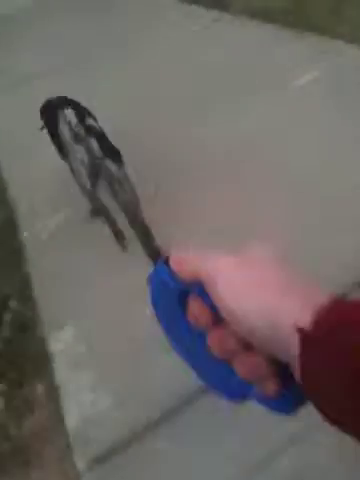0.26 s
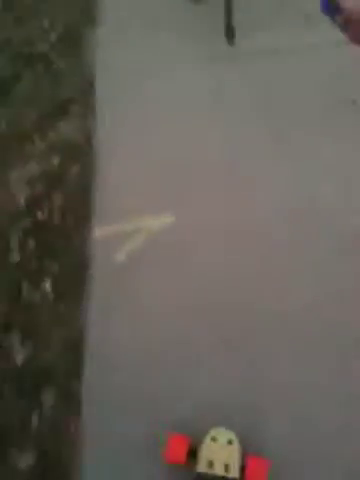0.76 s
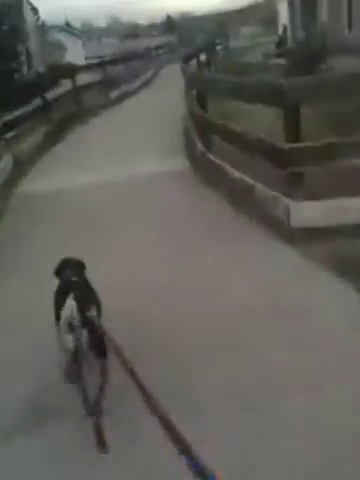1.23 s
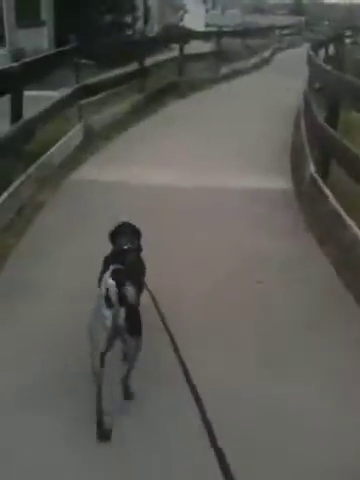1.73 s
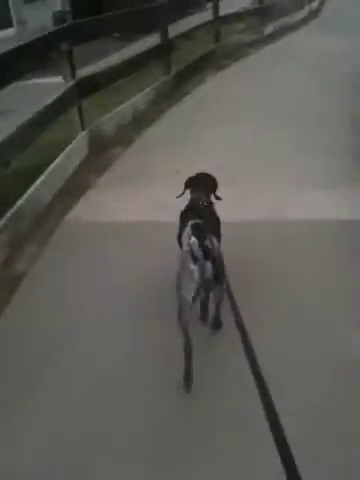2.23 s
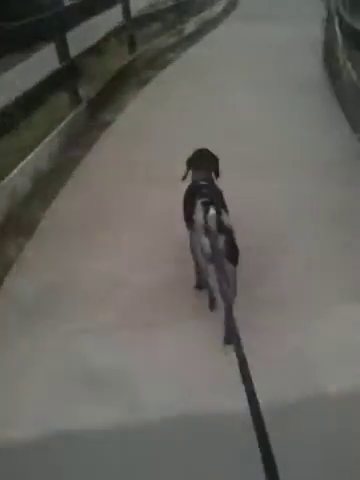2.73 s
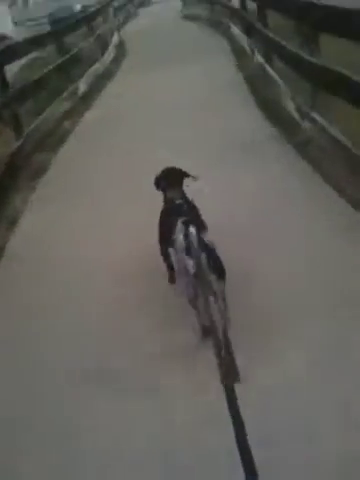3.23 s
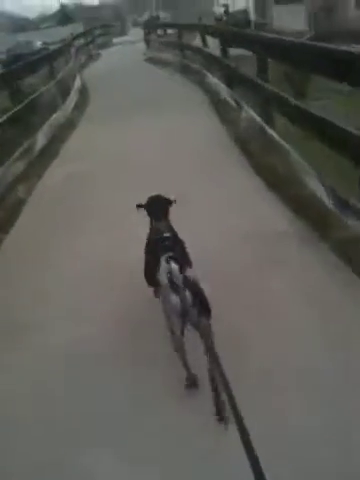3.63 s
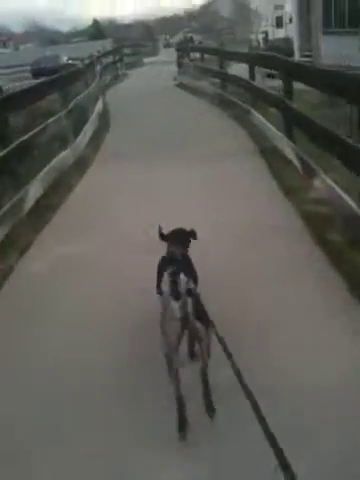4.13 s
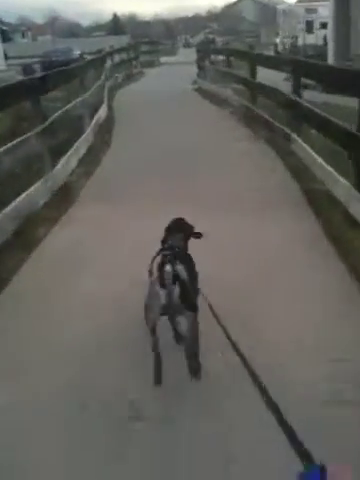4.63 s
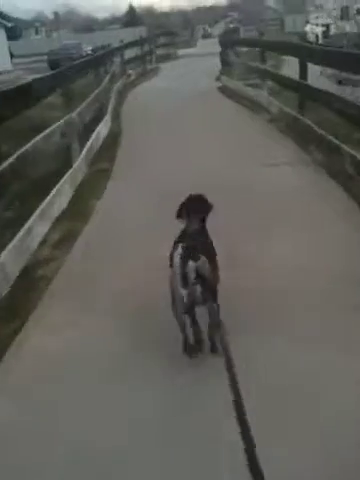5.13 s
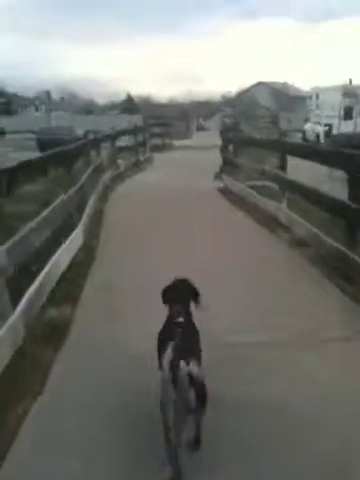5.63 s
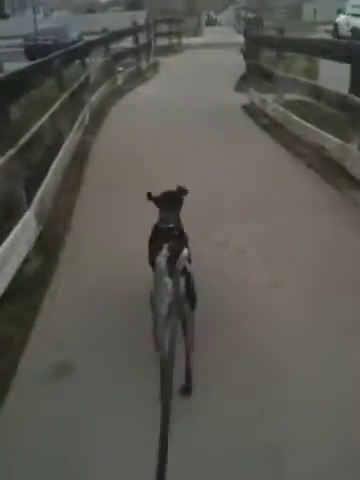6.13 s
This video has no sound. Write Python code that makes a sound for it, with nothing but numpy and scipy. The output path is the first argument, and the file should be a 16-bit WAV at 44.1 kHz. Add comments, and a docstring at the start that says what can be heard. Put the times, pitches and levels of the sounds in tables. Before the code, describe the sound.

Close, mono outdoor sound of a longboard rolling on concrete. The first second is a crowded clatter of hollow deck thumps, truck rattle and bright plastic clicks from a leash handle. Then the roll smooths into a low rumble with soft hiss, broken by double knocks as front and rear axles cross slab joints, growing stronger and closer together. A light sleeve swish comes now and then, and one crisp handle click near the end.

```python
"""A longboard rolls along a fenced concrete path: noise filtered by deck, trucks and treads, with faint bearings.
Wheels knock over cracks, gaps and slab joints, front axle then rear: chattering noise bursts and ringing deck modes.
The rails scatter a faint answer. The plastic handle of a leash clicks as decaying sines and snaps,
a sleeve swishes as swelling noise, and loose grains crack under the treads."""
import sys
import numpy as np
from scipy import signal
from scipy.fft import rfft, irfft, next_fast_len
from scipy.io import wavfile
from scipy.ndimage import map_coordinates

SR = 44100
rng = np.random.default_rng(int(sys.argv[2]) if len(sys.argv) > 2 else 0)


def wav_record(signal):
    """Record a signal, one row per channel, as 16-bit PCM in the file named by sys.argv[1]."""
    frames = np.transpose(np.atleast_2d(signal))
    bounded = np.clip(frames, -1, 1)
    # unit amplitude maps onto the largest positive 16-bit level
    quanta = np.round(bounded * 32767).astype(np.int16)
    wavfile.write(sys.argv[1], SR, quanta)


N = 281358
TIME_S = np.arange(N) / SR
TOP_HZ = 16050  # upper band limit

# How hard the concrete shakes the board. Each row: time in seconds, level in dB.
SHAKING = [(0.0, -39), (0.76, -47.5), (1.1, -49), (1.7, -48.5), (2.06, -43.5), (2.45, -47), (3.4, -45),
           (3.52, -42), (3.66, -47), (4.3, -44), (4.62, -40.5), (5.06, -43.5), (5.58, -39.5), (5.79, -38.5),
           (5.99, -47.5), (6.38, -46)]
# Rolling treble. Each row: time in seconds, level in dB.
TREBLE = [(0.0, -51), (0.53, -48.5), (0.92, -50.5), (1.1, -49), (1.4, -55), (5.06, -52), (5.53, -50.5),
          (6.09, -52), (6.38, -52)]
# Brief swells of the boom. Each row: time of the height in seconds, bell's standard deviation in seconds, level in dB.
BOOM_SWELLS = [(0.05, 0.091, -36), (0.985, 0.026, -38)]
# Slab joints. Each row: time of the front axle in seconds, thud centre in Hz, then for the front axle
# and again for the rear: strength in dB, contact in seconds, brightness in dB, truck ring in Hz.
JOINTS = [(1.375, 333, -37.5, 0.033, 5.2, 2330, -31, 0.032, -0.5, 2820),
          (1.947, 346, -27, 0.013, 1.1, 2750, -27, 0.032, -1, 2480),
          (2.607, 302, -31.5, 0.02, 3.6, 2100, -33, 0.02, 0, 2860),
          (3.786, 380, -28.5, 0.018, 3.9, 2820, -30.5, 0.029, 2, 2670),
          (4.462, 360, -25, 0.014, 7.3, 2930, -25, 0.025, 2.5, 2370),
          (5.111, 403, -25.5, 0.0095, 8.4, 2380, -24.5, 0.011, 3, 2300),
          (5.744, 350, -26.5, 0.013, 7.1, 2310, -25.5, 0.023, 4, 1970)]
# Cracks and rough spots. Each row: time in seconds, strength in dB, thud centre in Hz,
# contact in seconds, brightness in dB, truck ring in Hz.
CRACKS = [(0.023, -38.5, 261, 0.019, 9.5, 1900), (0.042, -31, 455, 0.021, 11.5, 1590),
          (0.083, -33, 436, 0.033, 7, 1660), (0.184, -39.5, 440, 0.0043, 0, 2300),
          (0.258, -32.5, 378, 0.021, 0, 2690), (0.286, -33.5, 477, 0.015, 6, 2780),
          (0.3056, -26.5, 480, 0.03, -0.5, 2780), (0.342, -26.5, 428, 0.029, 0, 2800),
          (0.439, -30.5, 377, 0.018, 6, 2820), (0.523, -23.5, 420, 0.011, 2, 2920),
          (0.593, -24.5, 383, 0.037, 4, 2300), (0.605, -22.5, 394, 0.0066, 2, 1700),
          (0.711, -32, 510, 0.018, 6, 1680), (0.747, -37.5, 450, 0.011, -5, 1660),
          (0.805, -29, 400, 0.017, -1, 1540), (0.895, -24, 434, 0.024, 3, 1490),
          (0.943, -23.5, 368, 0.018, 2.5, 1485), (3.181, -39, 340, 0.032, 1, 2300),
          (3.325, -47.5, 420, 0.0059, 6, 2700), (3.546, -36, 410, 0.0076, -2.5, 2280)]
# A wheel lands squarely on the far edge of a gap. Each row: time in seconds, thump peak in dB, thud centre in Hz,
# t60 of the added damping in seconds, clack relative to the peak in dB, truck ring in Hz.
SLAMS = [(0.0584, -18.5, 420, 0.0087, -33, 1600), (0.0844, -17.5, 443, 0.0069, -29, 1650),
         (0.1036, -19.5, 450, 0.006, -21, 1600), (0.1429, -18.5, 404, 0.011, -31, 2300),
         (0.3046, -17.5, 480, .016, -21.5, 2780), (0.3208, -20.5, 520, 0.0077, -23, 2780),
         (0.3258, -16, 480, 0.0095, -25, 2840), (0.3443, -17, 380, 0.017, -28, 2780),
         (0.437, -16.5, 387, 0.0069, -29, 2780), (0.525, -16.5, 396, 0.02, -21, 2900),
         (0.604, -11, 336, 0.024, -22, 1650), (0.633, -19.5, 450, .016, -22, 2300),
         (0.816, -15.5, 335, 0.015, -32, 1550), (0.898, -23, 458, .016, -22, 1500),
         (0.9434, -12, 280, 0.023, -27, 1500), (0.957, -19, 328, 0.014, -19.5, 1610),
         (1.398, -24.5, 360, 0.0079, -23, 2330), (1.945, -20, 270, 0.04, -22.5, 2780),
         (2.2012, -20.5, 262, .014, -34, 2400), (2.6196, -22.5, 347, 0.008, -23, 2110),
         (2.851, -21.5, 278, 0.024, -35, 2860), (3.7939, -17, 292, 0.016, -35, 2870),
         (4.016, -30, 402, 0.014, -33, 2670), (4.4639, -11, 395, 0.095, -23, 2870),
         (4.6798, -9, 310, 0.02, -28.5, 2430), (4.697, -29, 350, 0.022, -25, 2820),
         (5.1152, -15.5, 390, 0.02, -23, 2380), (5.3129, -18.5, 370, 0.014, -20.5, 2420),
         (5.321, -18.5, 443, 0.007, -21, 2330), (5.7486, -12, 340, 0.032, -26, 2300),
         (5.76, -21, 380, 0.022, -21, 2320), (5.938, -18.5, 328, .016, -22.5, 1970),
         (5.952, -24, 400, 0.013, -15.5, 1560)]
# Loose grains under a tread. Each row: time in seconds, strength in dB, ring in Hz, t60 in seconds.
PEBBLES = [(0.035, -51, 9000, .015), (0.0615, -40, 7100, .012), (0.185, -47, 6000, .008),
           (0.3072, -42, 4250, 0.014), (0.324, -42, 3770, .018), (0.606, -45, 5250, .02),
           (0.828, -53, 3500, .012), (1.4995, -62, 6500, 0.014), (2.357, -56.5, 4110, .05),
           (3.566, -58, 4400, .012), (3.7922, -45, 6430, .012), (4.019, -46, 6900, 0.018),
           (5.1132, -35.5, 5460, .025)]
# Leash handle. Each row: time in seconds, main ring level in dB, shell and snap relative to it in dB, main ring in Hz,
# main ring length as a factor, upper ring in Hz, upper ring in dB before a 2 dB cut, second tap relative in dB.
CLICKS = [(0.0228, -35, 4.5, 1900, 0.58, 3360, 8, -18), (0.0437, -30, -3, 1630, 1.2, 5080, -7, -8),
          (0.0476, -18.5, -8, 1560, 0.9, 5040, -4.5, -17), (0.0686, -32.5, 4.5, 1570, 0.91, 8540, 6, -17),
          (0.1026, -32.5, -2, 1600, 0.96, 2900, -5, -16), (0.1627, -31, -11, 1560, 1, 2300, -14, -19),
          (0.1727, -30.5, 1, 1550, 0.9, 2300, 5, -20), (0.2279, -14.5, -2, 1560, 0.98, 2330, -10, -19),
          (0.9125, -26, -2, 1420, 0.7, 3230, -2, -25), (1.377, -34.5, 2.5, 1900, 0.81, 2400, 3, -16),
          (1.539, -33, -3, 1540, 0.95, 1990, 1, -12), (2.1125, -31.5, -9.5, 1570, 1, 2310, -7, -12),
          (2.1885, -25, -0.5, 1540, 0.85, 2870, -12, -12), (6.19, -14, -4, 1508, 0.96, 3100, -6.5, -14)]
# Sleeve strokes. Each row: time of the height in seconds, bell's standard deviation in seconds,
# level in dB before a 1 dB cut, swish in Hz.
STROKES = [(0.359, 0.052, -53, 9000), (0.596, 0.063, -43.5, 5600), (1.158, 0.056, -42.5, 4600),
           (3.776, 0.027, -53, 6500), (4.182, 0.036, -47.5, 4400), (4.27, 0.0068, -46.5, 6000),
           (4.582, 0.038, -49, 5000), (5.438, 0.022, -49, 5500), (5.826, 0.014, -49, 5470),
           (6.07, 0.0029, -43, 6500), (6.262, 0.048, -50.5, 6500)]

# Relative spectra of the rolling layers. Each row: frequency in Hz, density in dB per Hz.
BOOM = [(25, -80), (60, -33), (95, -17), (125, -8.5), (168, 0), (230, -4.5), (300, -13), (450, -41),
        (900, -69)]
DRONE = [(30, -45), (100, -42.5), (200, -8), (290, -4), (390, -3), (480, -7), (580, -10), (720, -16),
         (1100, -25), (1700, -59), (3000, -70)]
GROWL = [(200, -46), (320, -13), (385, 5.5), (440, -14.5), (600, -50.5)]  # the deck's main resonance
WHIRR = [(3500, -38), (4800, -4), (5400, -3), (6200, 3), (7000, -9), (8200, -57), (11000, -43)]  # bearings
# Relative spectra of treads, blows, catch and sleeve. Each row: frequency in Hz, density in dB per Hz.
HISS = [(30, -32), (300, -2.5), (2500, -1.5), (4200, -1), (6200, 1), (7500, 2.5), (9500, -2.5),
        (12000, -4.5), (16000, -9.5)]
THUD = [(25, -35), (60, -33), (100, -23), (160, 0), (230, 3.5), (330, 2), (430, 2.5), (560, 2), (730, -9.5),
        (950, -15.5), (1400, -59.5), (3000, -58.5)]
RATTLE = [(500, -14), (900, 6), (1300, 2), (1800, -2), (2800, -3.5), (3700, -9), (5000, -22), (9000, -63)]
GRIT = [(2500, -17), (4200, 0.5), (5400, 3), (7500, 2), (10000, -3.5), (13500, -4.5), (16000, -7)]
CLACK = [(500, -19), (900, 2), (1500, 7), (2800, -3.5), (4000, -5.5), (6500, -9), (9000, -15), (16000, -28)]
SNAP = [(40, -33), (300, -9), (800, 0), (2500, 7), (5000, 1.5), (7000, 0), (8500, 7), (11000, -2.5),
        (16000, -6)]
CLOTH = [(500, -1.5), (1200, 2), (2300, -5.5), (3500, -2), (4600, -1), (5800, -3), (7500, -1), (11000, -5),
         (14000, -6), (16000, -11.5)]

# Resonances: deck under steady rolling, trucks and deck, metal hangers under grit.
# Each row: centre in Hz, width in Hz, height over the broad response in dB.
HUM = [(174, 50, 4.5), (250, 38, -4), (381, 16, 0.5), (713, 74, -2), (940, 160, -1)]
TRUCK = [(1574, 60, 4), (1860, 61, 4), (2262, 70, 3), (2404, 96, 1.5), (2770, 68, 6.5), (3250, 140, 3)]
HANGERS = [(5170, 350, 3.5), (6140, 300, 0.5), (7280, 180, 3)]
# Modes of the struck deck, before pitch scaling and scatter. Each row: frequency in Hz, level in dB, t60 in seconds.
DECK_MODES = [(172, -33.5, 0.13), (313, -8, 0.037), (365, -0.5, 0.031), (501, 2.5, 0.016),
              (654, -35, 0.032)]
# Modes of the handle shell, before scatter. Each row: frequency in Hz, level in dB, t60 in seconds.
SHELL_MODES = [(398, -13.5, 0.039), (560, -11, 0.013), (2370, -14, 0.013), (3120, -14, 0.0081),
               (4320, -9, .012), (5200, -14, 0.0068), (6140, -10, 0.012), (8200, -12.5, 0.0097),
               (9400, -13, 0.0064), (11500, -10.5, 0.0082), (14000, -20, .007)]

DRONE_DB, GROWL_DB, GROWL_SWING_DB = -1.87, -8.5, 4.5  # over the shaking; swing of the growl
TREAD_DB, HISS_DB = -5.5, -4.5  # over the treble
BOOM_DB, BOOM_FOLLOWS = -50, 0.28  # mean boom; share of the shaking's swings it follows
# Bearings grow louder as the board gathers speed, up to a steady level.
BEARING_DB, BEARING_RISE_DB_PER_S, BEARING_STEADY_S = -61, 7, 5.06
GROWL_WANDER_HZ = 22.02  # the rider's shifting weight retunes the growl
HISS_GRIT_DB = -6  # crushed grit over the smooth hiss
GRAINS_PER_S, GRAIN_T60_S = 6000, 0.0068

# Rear axle delay at time 0, and its shrinkage as the board gathers speed.
AXLE_GAP_S, GAP_SHRINK_S_PER_S = 0.2862, 0.0163
LEAD_S, LEAD_DB = 0.006, -15  # a wheel dips into a gap just before the far edge
KNOCK_S = 0.016  # a burst has the energy of its level held this long
THUD_DB, RATTLE_DB, GRIT_DB = 2.3, -13.5, -19  # over the strength, at brightness 0
THUD_WIDTH_HZ, THUD_RING_DB = 110, 3  # deck resonance while a wheel chatters
TRUCK_WIDTH_HZ, TRUCK_RING_DB = 420, 7  # truck resonance rung most by a blow
DECK_REF_HZ = 385  # thud centre at which the deck is not retuned
DECK_LOW_HZ = 130  # the thump is cut below this
DECK_LAG_S = 0.004  # mode phase and damping start after this
CLACK_DELAY_S, CLACK_T60_S = 0.0028, 0.021
FENCE_DB, FENCE_T60_S = -18.5, 0.32

SHELL_SWELL_S = 0.0016  # main ring peaks after this, times the length factor
SHELL_SCATTER = 0.023  # shell pitches vary a little at random from click to click, share of pitch
UPPER_T60_S, SNAP_T60_S, SNAP_DB = 0.018, 0.016, -4.5  # snap gain before the click's gains
REBOUND_S, REBOUND_DB = 0.0021, -4  # the catch snaps again as it seats
SECOND_TAP_S = 0.0059
SWISH_WIDTH_HZ, SWISH_DB = 840, 2.5  # the weave sings in a narrow band


def amp(db):
    """Decibels to gain."""
    return 10 ** (np.asarray(db) / 20)


def unit(x):
    """x at rms 1."""
    return x / np.sqrt(np.mean(x ** 2) + 1e-20)


def wobble(rate_hz, count=N):
    """Smooth random curve with rate_hz knots a second."""
    knots = rng.standard_normal(int(count * rate_hz / SR) + 4)
    return map_coordinates(knots, [TIME_S[:count] * rate_hz])


def response(points, peaks=(), stretch=1, size=4096):
    """Minimum-phase impulse response of energy 1 with this spectrum and these resonances."""
    hz = np.fft.rfftfreq(size, 1 / SR)
    point_hz, point_db = np.transpose(points)
    level_db = np.interp(np.log(hz + 1), np.log(point_hz * stretch), point_db)
    for centre_hz, width_hz, db in peaks:
        level_db = level_db + db / (1 + (2 * (hz - centre_hz) / width_hz) ** 2)
    # Folding the cepstrum makes the response causal.
    cepstrum = irfft(np.log(amp(level_db)))
    cepstrum[1:size // 2] *= 2
    cepstrum[size // 2 + 1:] = 0
    ring = irfft(np.exp(rfft(cepstrum)))
    return ring / np.linalg.norm(ring)


def through(force, ring):
    """Output of a body with this impulse response under this force."""
    return signal.fftconvolve(force, ring)[:len(force)]


def grains(count, rough):
    """Random small impacts; the rougher, the more single ones stand out."""
    sign, size = rng.standard_normal((2, count))
    return unit(sign * np.exp(rough * size))


def add(track, start_s, sound):
    """Mix a sound into a track from start_s."""
    part = track[max(round(start_s * SR), 0):][:len(sound)]
    part += sound[:len(part)]


def burst(x, db):
    """x with the energy of a sound that holds this level for KNOCK_S."""
    return x * amp(db) * np.sqrt(KNOCK_S * SR / np.sum(x ** 2))


def crackle(count, rough):
    """Crushed grit: every grain is a brief decaying sine at a pitch of its own."""
    t = np.arange(SR // 256) / SR
    number = count * GRAINS_PER_S // SR
    when, pitch = rng.random((2, number, 1))
    size = np.exp(rough * rng.standard_normal((number, 1)))
    ticks = size * np.sin(2 * np.pi * TOP_HZ * pitch * t) * amp(-60 * t / GRAIN_T60_S)
    where = (when * count).astype(int) + np.arange(len(t))
    return unit(np.bincount(where.ravel(), ticks.ravel(), count)[:count])


def swells(rows):
    """Gain over time: one Gaussian bell per row."""
    return sum(amp(db) * np.exp(-((TIME_S - s) / spread_s) ** 2 / 2) for s, spread_s, db in rows)


def rolling():
    """The grain of the concrete shakes deck and trucks and hisses under the treads; the bearings whirr."""
    shake_db = np.interp(TIME_S, *np.transpose(SHAKING))
    treble_db = np.interp(TIME_S, *np.transpose(TREBLE))
    boom_db = BOOM_DB + BOOM_FOLLOWS * (shake_db - shake_db.mean())
    bearing_db = BEARING_DB - BEARING_RISE_DB_PER_S * np.maximum(BEARING_STEADY_S - TIME_S, 0)
    surface = wobble(22.02)  # coarse and smooth patches pass under the wheels
    boom = unit(through(grains(N, rough=0.53), response(BOOM)))
    drone = unit(through(grains(N, rough=0.58), response(DRONE, HUM)))
    growl = unit(through(grains(N, rough=0.66), response(GROWL)))
    # Frequency shift: the growl wanders in pitch.
    drift_rad = 2 * np.pi * np.cumsum(GROWL_WANDER_HZ * wobble(5)) / SR
    growl = np.real(signal.hilbert(growl, next_fast_len(N))[:N] * np.exp(1j * drift_rad))
    tread = unit(through(grains(N, rough=0.48), response(RATTLE, TRUCK)))
    gritty = rng.standard_normal(N) + amp(HISS_GRIT_DB) * crackle(N, rough=0.49)
    hiss = unit(through(gritty, response(HISS)))
    whirr = unit(through(rng.standard_normal(N), response(WHIRR)))
    return (boom * (amp(boom_db + 0.93 * surface) + swells(BOOM_SWELLS))
            + drone * amp(shake_db + DRONE_DB + 0.19 * surface)
            + growl * amp(shake_db + GROWL_DB + GROWL_SWING_DB * wobble(16))
            + tread * amp(treble_db + TREAD_DB + 3.05 * surface)
            + hiss * amp(treble_db + HISS_DB + surface + wobble(57))
            + whirr * amp(bearing_db + 0.31 * wobble(9.1)))


def knock(centre_hz, db, contact_s, bright_db, ring_hz):
    """A wheel dips, hits an edge and chatters across it: the deck thuds, the trucks rattle, grit cracks."""
    t = np.arange(SR // 4) / SR
    after_s = np.maximum(t - LEAD_S - contact_s, 0)
    dip, hit = [1 - np.exp(-(np.maximum(t - start_s, 0) / 0.0014) ** 2) for start_s in (0, LEAD_S)]
    decay = amp(-60 * after_s / 0.065) + amp(-23.5 - 60 * after_s / 0.4)
    contact = np.maximum(amp(LEAD_DB) * dip, hit) * decay
    stretch = (centre_hz / DECK_REF_HZ) ** 0.45
    deck = response(THUD, [(centre_hz, THUD_WIDTH_HZ, THUD_RING_DB)], stretch)
    thud = through(contact * grains(len(t), rough=0.47), deck)
    bounce = contact * amp(1.9 * wobble(178, count=len(t)))  # loose hardware lands in quick bursts
    trucks = response(RATTLE, [*TRUCK, (ring_hz, TRUCK_WIDTH_HZ, TRUCK_RING_DB)])
    rattle = through(bounce * grains(len(t), rough=0.51), trucks)
    crunch = through(bounce * crackle(len(t), rough=0.4), response(GRIT, HANGERS))
    return (burst(thud, db + THUD_DB)
            + burst(rattle, db + bright_db + RATTLE_DB)
            + burst(crunch, db + bright_db + GRIT_DB))


def cracks():
    """Cracks and rough spots give single knocks, crowded together in the first second."""
    out = np.zeros(N)
    for s, db, centre_hz, contact_s, bright_db, ring_hz in CRACKS:
        add(out, s - LEAD_S, knock(centre_hz, db, contact_s, bright_db, ring_hz))
    return out


def leash():
    """The catch snaps against the hollow plastic handle, which rings briefly and is tapped once more."""
    out, t = np.zeros(N), np.arange(SR // 16) / SR
    for s, db, snap_db, ring_hz, life, upper_hz, upper_db, tap_db in CLICKS:
        age = t / (SHELL_SWELL_S * life)
        ring = age * np.exp((1 - age ** 2) / 2) * np.sin(2 * np.pi * ring_hz * t)
        ring += amp(upper_db - 2 - 60 * t / UPPER_T60_S) * np.sin(2 * np.pi * upper_hz * t)
        pitch_factor = 1 + SHELL_SCATTER * rng.standard_normal()
        shell = np.zeros(len(t))
        for k, (hz, level_db, t60_s) in enumerate(SHELL_MODES):
            gain = (-1) ** k * amp(level_db + rng.normal(0, 3.1) - 60 * t / t60_s)
            shell += gain * np.sin(2 * np.pi * hz * pitch_factor * t)
        strike = rng.standard_normal(len(t)) * amp(-60 * t / SNAP_T60_S)
        snap = amp(SNAP_DB) * through(strike, response(SNAP))
        click = amp(db) * (ring + amp(snap_db) * (shell + snap))
        add(out, s, click)
        add(out, s + REBOUND_S, amp(db + snap_db + REBOUND_DB) * snap)
        add(out, s + SECOND_TAP_S, amp(tap_db) * click)
    return out


def pebbles():
    """A tread catches a loose grain, which cracks at its own pitch."""
    out, t = np.zeros(N), np.arange(SR // 16) / SR
    for s, db, ring_hz, t60_s in PEBBLES:
        force = grains(len(t), rough=0.28) * amp(-60 * t / t60_s)
        crack = through(force, response(HISS, [(ring_hz, 1200, 16)]))
        add(out, s, burst(crack, db))
    return out


def deck_ring(t, stretch):
    """The deck's modes, swelling as the soft wheel climbs the edge, at new strengths for each blow."""
    ring = np.zeros(len(t))
    for hz, level_db, t60_s in DECK_MODES:
        gain = amp(level_db + rng.normal(0, 0.68) - 60 * t / t60_s)
        ring += gain * np.sin(2 * np.pi * hz * stretch * (t - DECK_LAG_S))
    return ring * (1 - np.exp(-(t / 0.0056) ** 2))


def slams():
    """A square landing is one clean blow: the deck thumps, damped by the rider's feet, and the trucks clack."""
    out, t = np.zeros(N), np.arange(SR // 8) / SR
    low_cut = signal.butter(3, DECK_LOW_HZ, "highpass", fs=SR, output="sos")
    for s, db, centre_hz, t60_s, clack_db, ring_hz in SLAMS:
        damping = amp(-60 * np.maximum(t - DECK_LAG_S, 0) / t60_s)
        thump = signal.sosfilt(low_cut, deck_ring(t, centre_hz / DECK_REF_HZ) * damping)
        force = grains(len(t), rough=0.73) * amp(-60 * t / CLACK_T60_S)
        trucks = response(CLACK, [*TRUCK, (ring_hz, TRUCK_WIDTH_HZ, TRUCK_RING_DB)])
        clack = through(force, trucks)
        add(out, s, amp(db) * thump / np.abs(thump).max())
        add(out, s + CLACK_DELAY_S, burst(clack, db + clack_db))
    return out


def fences(x):
    """The rails on both sides scatter a short answer, modelled as decaying noise."""
    t = np.arange(SR // 2) / SR
    onset = 1 - np.exp(-(t / 0.0017) ** 2)
    tail = rng.standard_normal(len(t)) * amp(-60 * t / FENCE_T60_S) * onset
    return through(x, tail / np.linalg.norm(tail))


def sleeve():
    """Cloth slides on cloth in smooth swells, each with a swish of its own pitch."""
    out, t = np.zeros(N), np.arange(-SR // 4, SR // 4) / SR
    for s, spread_s, db, swish_hz in STROKES:
        weave = response(CLOTH, [(swish_hz, SWISH_WIDTH_HZ, SWISH_DB)])
        rub = unit(through(grains(len(t), rough=0.17), weave))
        add(out, s + t[0], amp(db - 1.0) * np.exp(-(t / spread_s) ** 2 / 2) * rub)
    return out


def joints():
    """Each slab joint is struck twice: by the front axle, then by the rear, ever sooner."""
    out = np.zeros(N)
    for s, centre_hz, *axles in JOINTS:
        gap_s = AXLE_GAP_S - GAP_SHRINK_S_PER_S * s
        add(out, s - LEAD_S, knock(centre_hz, *axles[:4]))
        add(out, s + gap_s - LEAD_S, knock(centre_hz, *axles[4:]))
    return out


def scene():
    """The board on the ground with its fence answer, the leash and the sleeve, in one channel."""
    knocks = joints() + cracks() + slams()
    board = rolling() + knocks + amp(FENCE_DB) * fences(knocks)
    return (board + leash() + sleeve() + pebbles())[None]


def record(dry):
    """Sharp cut of everything from TOP_HZ up."""
    size = next_fast_len(N + SR // 4)
    kept = np.fft.rfftfreq(size, 1 / SR) < TOP_HZ
    return irfft(rfft(dry, size) * kept, size)[:, :N]


dry = scene()
out = record(dry)
wav_record(out)
```